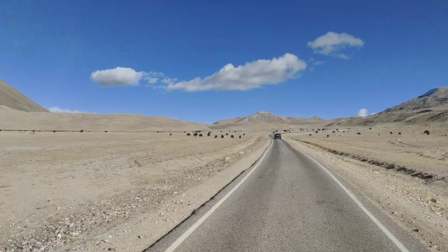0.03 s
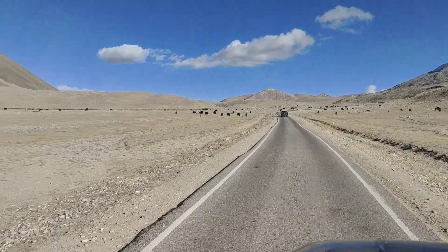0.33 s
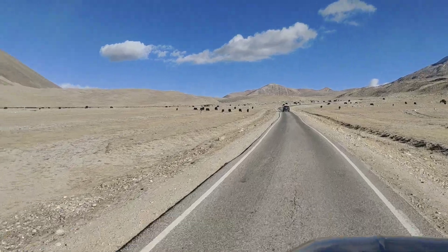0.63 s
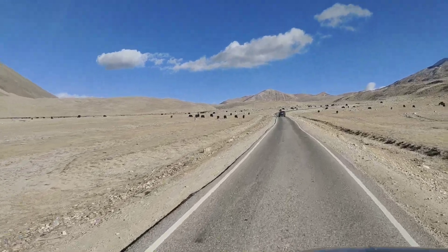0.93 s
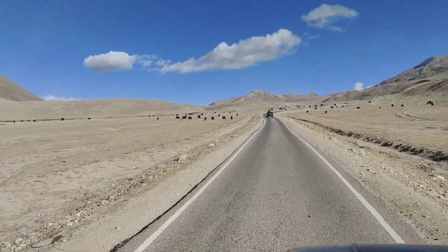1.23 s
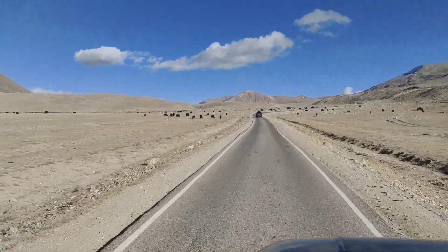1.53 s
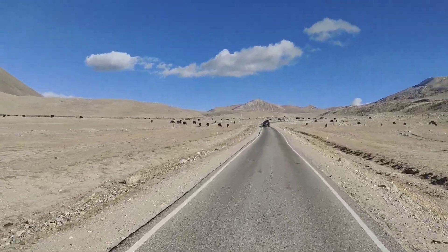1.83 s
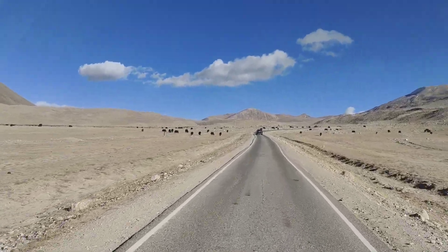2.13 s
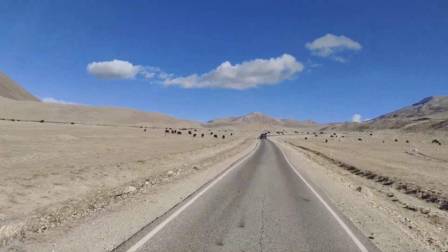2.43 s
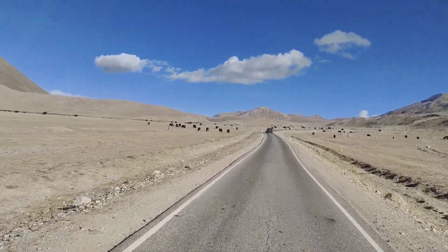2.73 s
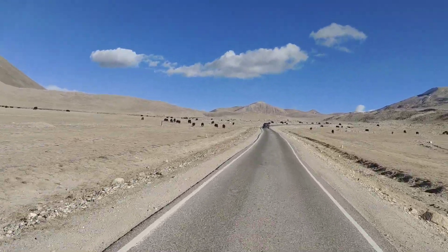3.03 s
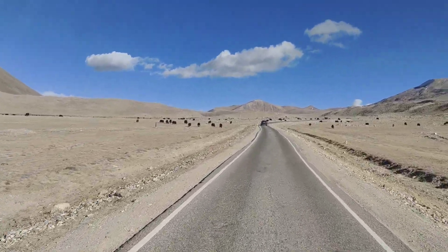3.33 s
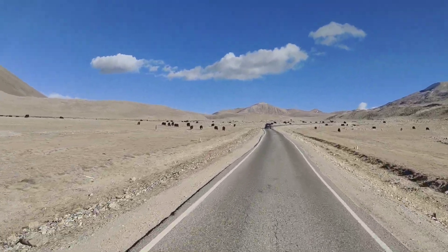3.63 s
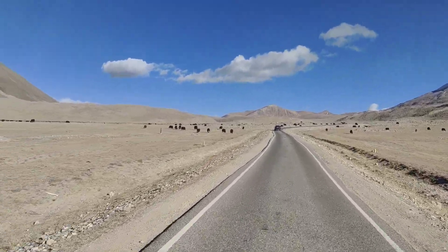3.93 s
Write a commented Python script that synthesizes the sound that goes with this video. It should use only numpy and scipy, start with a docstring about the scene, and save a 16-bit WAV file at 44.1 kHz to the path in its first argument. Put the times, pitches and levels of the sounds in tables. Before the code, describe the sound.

A low engine drone with road rumble and tyre roar, heard inside a moving car, cuts in at about 0.4 seconds and continues to 4 seconds, rising slightly in pitch. Loose trim ticks faintly and irregularly from 0.7 seconds on. Thin air hiss swells briefly around 1 to 1.5 seconds, and the rumble bumps at 2 seconds. Two very faint high whistles rise and fade between about 1.5 and 3.5 seconds.

```python
"""Car cabin, gently gathering speed

The engine drones through the cabin over the rumble of a paved road and the roar of the tyres.
Loose trim buzzes in short ticks; thin air hiss and two faint rising whistles lie on top.
The sound cuts in after a moment of silence."""
import sys
import numpy as np
from scipy.fft import rfft, irfft, next_fast_len
from scipy.io import wavfile
from scipy.ndimage import map_coordinates

SR = 44100
rng = np.random.default_rng(int(sys.argv[2]) if len(sys.argv) > 2 else 0)


def log_audio(samples):
    """Write samples as a 16-bit WAV file to the path given in sys.argv[1]."""
    # one column per channel
    frames = np.atleast_2d(samples).T
    # limit to full scale, then quantise
    limited = np.clip(frames, -1, 1)
    pcm = np.round(limited * 32767).astype(np.int16)
    wavfile.write(sys.argv[1], SR, pcm)


N = 176400
START_S = 0.3622  # silence before this


def amp(db):
    """Decibels to gain."""
    return 10 ** (np.asarray(db) / 20)


def unit(x):
    """x scaled to rms 1."""
    return x / np.sqrt(np.mean(x ** 2) + 1e-20)


def along(rows, hz):
    """Each column after the frequency, read at hz on a log axis."""
    knots_hz, *columns = np.transpose(rows)
    return np.array([np.interp(np.log(hz + 1), np.log(knots_hz + 1), c) for c in columns])


def curves(rows):
    """Each column after the time, one value per sample."""
    knots_s, *columns = np.transpose(rows)
    return [np.interp(np.arange(N) / SR, knots_s, c) for c in columns]


def wobble(knots_per_s):
    """Smooth random curve, rms near 1."""
    return map_coordinates(rng.standard_normal(4096), [np.arange(N) * knots_per_s / SR], mode="wrap")


def filtered(x, response):
    """x through the frequency response given as a function of Hz."""
    size = next_fast_len(N + SR // 2)
    return irfft(rfft(x, size) * response(np.fft.rfftfreq(size, 1 / SR)), size)[..., :N]


def coloured(x, spectrum):
    """x shaped by a table of Hz and relative dB, at rms 1."""
    return unit(filtered(x, lambda hz: amp(along(spectrum, hz))))


def pan(db):
    """Channel gains for a left-minus-right level difference."""
    return amp(np.array([[db], [-db]]) / 2)


def engine(waver_db=1.47, speed_waver=.002):
    """Orders of the firing rate, each wavering as the speed climbs; the first two boom in the cabin."""
    # Each row: time in seconds, firing rate in Hz.
    firing = [(.4, 52.48), (1.5, 54.73), (2.25, 56.54), (3, 58.7), (4, 61.57)]
    # Each row: time in seconds, level of order 1 in dB, level of order 2 in dB.
    boom = [(.4, -33.5, -41.5), (.75, -34.5, -41), (1.1, -32.5, -45.5), (1.5, -33.5, -42),
            (1.85, -39.5, -41.5), (2.25, -40, -42.5), (2.75, -32.5, -40), (3.3, -31.5, -35.5),
            (4, -31, -35)]
    # Each row: multiple of the firing rate, level in dB at the lowest speed and at the highest.
    weak_orders = [(.5, -54, -44), (1.5, -54, -51), (2.5, -58, -61), (3, -46, -46.5), (4, -54, -59.5),
                   (5, -69.5, -54.5), (6, -67, -55), (7, -58, -68), (13.5, -85, -63.5)]
    firing_hz, = curves(firing)
    phase = 2 * np.pi * np.cumsum(firing_hz * (1 + speed_waver * wobble(6.07))) / SR
    speed = (firing_hz - firing_hz.min()) / np.ptp(firing_hz)
    orders = list(enumerate(curves(boom), 1))
    orders += [(order, slow_db + (fast_db - slow_db) * speed) for order, slow_db, fast_db in weak_orders]
    drone = np.zeros(N)
    for order, level_db in orders:
        drone += amp(level_db + waver_db * wobble(8)) * np.sin(order * phase + rng.uniform(0, 2 * np.pi))
    return np.sqrt(2) * drone


def rumble(shake_waver_db=2, drum_db=-40, drum_db_per_s=0.5, drum_waver_db=1):
    """The uneven road shakes the body; its texture drums in the panels, louder with speed."""
    # Each row: time in seconds, level of the shaking in dB.
    shake_levels = [(.4, -37), (.7, -32), (.9, -35), (1.3, -35), (1.85, -36.5), (2.02, -26), (2.15, -38.5),
                    (2.55, -32.5), (3.3, -36), (3.75, -34), (3.94, -31), (4, -37)]
    # Body shake. Each row: frequency in Hz, relative density in dB.
    shake_spectrum = [(5, -89), (9, -71), (15, -49.5), (26, -49), (39, -47.5), (54, -53.5), (65, -51),
                      (85, -60), (120, -78), (300, -120)]
    # Panel drumming. Each row: frequency in Hz, relative density in dB.
    drum_spectrum = [(40, -100), (80, -63.5), (102, -57.5), (122, -57.5), (140, -61), (180, -62),
                     (220, -67.5), (238, -66), (275, -76.5), (345, -73.5), (430, -104), (900, -130)]
    t = np.arange(N) / SR
    shake_db, = curves(shake_levels)
    shake_gain = amp(shake_db + shake_waver_db * wobble(14))
    shake = shake_gain * coloured(rng.standard_normal(N), shake_spectrum)
    drum_gain = amp(drum_db + drum_db_per_s * (t - t.mean()) + drum_waver_db * wobble(14))
    drum = drum_gain * coloured(rng.standard_normal(N), drum_spectrum)
    return pan(db=4.5) * shake + pan(db=3) * drum


def tyres(gain_db=4.5, grain_db=1, lag_s=0.00042, lag_from_hz=650):
    """Tread roar, coloured by the cabin and fluttering with the grain of the road."""
    # Each row: time in seconds, level in dB before gain_db.
    levels = [(0.4, -51.5), (0.62, -51.5), (1.02, -51), (1.14, -52.5), (2.34, -52.5), (2.35, -51.5),
              (3.95, -50), (3.97, -52)]
    # Each row: frequency in Hz, relative density in dB left and right.
    spectrum = [(145, -106, -106), (280, -70, -76), (367, -72.5, -73), (474, -79, -78.5),
                (560, -75.5, -77.5), (813, -76.5, -81.5), (1040, -80.5, -82), (1180, -80.5, -85),
                (1570, -83.5, -89.5), (2186, -86.5, -93), (2880, -96, -95), (4200, -110, -110),
                (6900, -135, -135)]
    # Each row: frequency in Hz, left-right coherence from 0 to 1.
    coherence = [(200, 0.57), (370, 0.58), (500, 0.23), (750, .2), (900, 0.7), (1350, .58), (1550, 0.23),
                 (2600, 0.14)]
    level_db, = curves(levels)
    width_rad = lambda hz: np.arccos(np.clip(along(coherence, hz)[0], -1, 1)) / 2
    mid_side_gains = lambda hz: np.array([np.cos(width_rad(hz)), np.sin(width_rad(hz))])
    mid, side = filtered(rng.standard_normal((2, N)), mid_side_gains)
    # The upper roar reaches the right side first.
    lag = lambda hz: np.exp(1j * np.pi * hz * (hz > lag_from_hz) * lag_s * np.array([[-1], [1]]))
    roar = filtered(np.array([mid + side, mid - side]), lambda hz: cabin(hz) * lag(hz))
    return amp(level_db + gain_db + grain_db * wobble(50)) * coloured(roar, spectrum)


def cabin(hz, ripple_db=1.33, spacing_hz=14, ripple_from_hz=400):
    """Cabin gain at hz: a few clear resonances over a random ripple of weak modes."""
    # Each row: centre in Hz, width in Hz, lift in dB.
    resonances = [(467, 20, 1.5), (630, 35, -0.5), (811, 32, 2.5), (1220, 60, 2.5), (1253, 38, 3.5),
                  (1497, 24, 4.5), (1605, 48, 3), (1950, 77, 1.5)]
    ripple = np.array([map_coordinates(rng.standard_normal(4096), [hz / spacing_hz], mode="wrap")])
    lift_db = sum(db / (1 + (2 * (hz - centre_hz) / width_hz) ** 2)
                  for centre_hz, width_hz, db in resonances)
    return amp(ripple_db * ripple * (hz > ripple_from_hz) + lift_db)


def trim(clear_db=-47.5, contrast=1.18, faint_count=55, faint_db=-56, spread_db=3.5, faint_treble_db=-8):
    """Loose trim chafes in bursts of a few milliseconds: some clear and bright, many faint and dull."""
    # Each row: start in seconds, then level, left minus right and treble in dB.
    # The dB columns count relative to their means.
    ticks = [(0.737, -47, 4.0, -15), (0.7939, -44.5, 6, -20), (0.9042, -43, 7, -18), (0.9975, -44, 0, -18),
             (1.0572, -35.5, 10.5, -15.5), (1.669, -44, 7, -19), (1.8084, -45, 3.0, -20),
             (1.9963, -38.5, 6, -20), (2.0551, -35, 4, -18), (2.418, -42, 4, -23), (2.4916, -39, 1, -20),
             (2.6378, -38, 6, -15), (2.778, -41, 0, -20), (2.9364, -39.5, 10.5, -17),
             (3.0708, -43, 3.5, -16), (3.1092, -44, 8, -16), (3.1643, -41.5, 3, -16),
             (3.3437, -39.5, 4.0, -20), (3.386, -39.5, 4, -13), (3.5931, -39, 1, -12),
             (3.615, -40.5, 0, -15), (3.8436, -43, 3.5, -17), (3.9573, -39.5, -3, -19),
             (3.9816, -36, 3, -15)]
    # Ringing of the trim. Each row: frequency in Hz, relative density in dB left and right.
    spectrum = [(2000, -18, -33), (4950, -10, -17), (5430, 0.5, 0), (6530, 4, -2), (8100, -8, 1),
                (8800, -2, 2.5), (10200, -13, -12), (12500, -11, -15), (14100, -7, -13), (15900, -8, -16)]
    rise_s, hold_s, t60_s, treble_from_hz = .002, .001, .009, 10000
    t = np.arange(SR // 20) / SR
    burst = np.minimum(t / rise_s, 1) * amp(-60 * np.maximum(t - rise_s - hold_s, 0) / t60_s)
    mean_db, mean_pan_db, mean_treble_db = np.mean(ticks, axis=0)[1:]
    clear = [(start_s, clear_db + contrast * (db - mean_db), pan_db - mean_pan_db,
              treble_db - mean_treble_db) for start_s, db, pan_db, treble_db in ticks]
    faint = [(rng.uniform(START_S, N / SR), rng.normal(faint_db, spread_db), 0, faint_treble_db)
             for _ in range(faint_count)]
    body_gain, treble_gain = np.zeros((2, 2, N + SR))
    for start_s, db, pan_db, treble_db in clear + faint:
        start = round(start_s * SR)
        body_gain[:, start:start + len(t)] += amp(db) * pan(pan_db) * burst
        treble_gain[:, start:start + len(t)] += amp(db + treble_db) * pan(pan_db) * burst
    chafe = coloured(rng.standard_normal((2, N)), spectrum)
    body = filtered(chafe, lambda hz: hz < treble_from_hz)
    return pan(db=6) * (body_gain[:, :N] * body + treble_gain[:, :N] * (chafe - body))


def hiss(steady_db=-57.5, rise_db_per_s=0.8, surge_db=-57, flutter_db=1):
    """Air hiss that grows with speed and surges once."""
    # Each row: frequency in Hz, relative density in dB left and right.
    steady_spectrum = [(1500, -120, -120), (3220, -100, -98.5), (4250, -96, -97.5), (4800, -97, -99.4),
                       (5730, -94.5, -97.5), (6580, -90.5, -96), (7860, -96.5, -93.5), (9240, -100.5, -97),
                       (10060, -104.8, -105.4), (12800, -99, -107.2), (15000, -102.1, -117.5)]
    # Same columns, for the surge.
    surge_spectrum = [(2500, -14, -19), (4500, -7, -9), (6000, -5, -11), (7450, 0, -1), (8500, -11, -2.5),
                      (10200, -12, -14), (12500, -10, -14), (15500, -20, -23)]
    surge_from_s, surge_to_s, ramp_s = 0.93, 1.46, 0.079
    t = np.arange(N) / SR
    steady_gain = amp(steady_db + rise_db_per_s * (t - t.mean()))
    steady = steady_gain * coloured(rng.standard_normal((2, N)), steady_spectrum)
    gate = np.clip(np.minimum(t - surge_from_s, surge_to_s - t) / ramp_s, 0, 1)
    surge = amp(surge_db) * gate * coloured(rng.standard_normal((2, N)), surge_spectrum)
    return (steady + surge) * amp(flutter_db * wobble(20))


def whistles(lower_ratio=.912, width_hz=190, waver_db=1):
    """Two fuzzy high lines that swell and fade, rising as the engine pulls."""
    # Each row: time in seconds, upper pitch in Hz, level of the pair in dB.
    glide = [(.4, 11800, -96), (1.1, 12400, -86), (1.6, 12850, -75), (2.2, 13400, -76), (2.8, 13790, -74),
             (3.4, 13950, -81), (4, 13900, -90)]
    pitch_hz, level_db = curves(glide)
    phase = 2 * np.pi * np.cumsum(pitch_hz) / SR
    pair = np.zeros(N)
    for ratio in (1, lower_ratio):
        waver = amp(waver_db * wobble(7.25))
        fuzz = wobble(2 * width_hz) + 1j * wobble(2 * width_hz)
        pair += (waver * fuzz * np.exp(1j * ratio * phase)).real
    return pan(db=8) * amp(level_db) * unit(pair)


def scene():
    """Nearly mono bass, stronger on the left, under wide roar, hiss, whistles and ticks."""
    return pan(db=3) * engine() + rumble() + tyres() + hiss() + whistles() + trim()


def record(dry, fade_in_s=.003, top_hz=15600):
    """Abrupt cut-in, then a hard band limit."""
    gate = np.clip((np.arange(N) / SR - START_S) / fade_in_s, 0, 1)
    return filtered(dry * gate, lambda hz: hz < top_hz)


dry = scene()
out = record(dry)
log_audio(out)
```